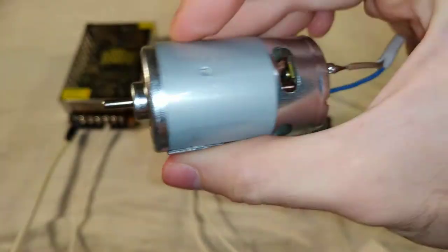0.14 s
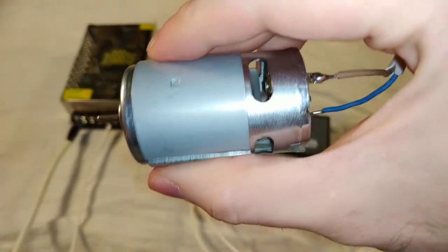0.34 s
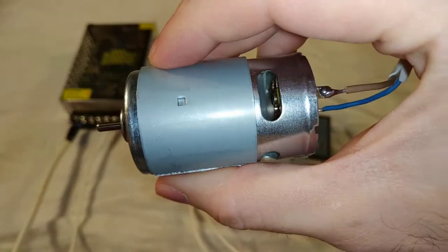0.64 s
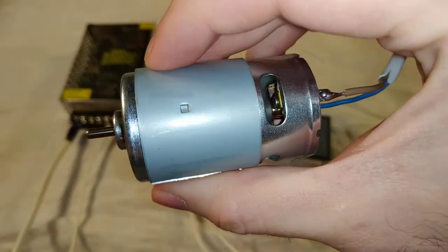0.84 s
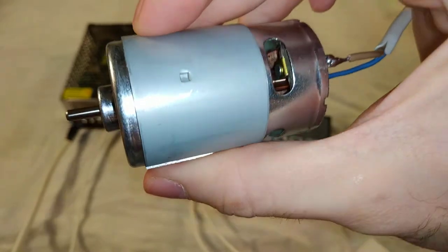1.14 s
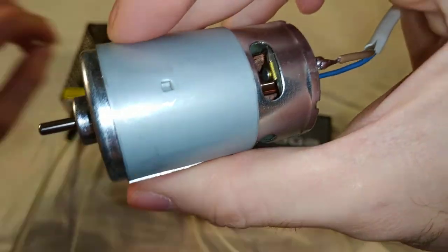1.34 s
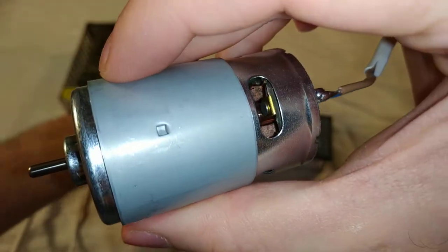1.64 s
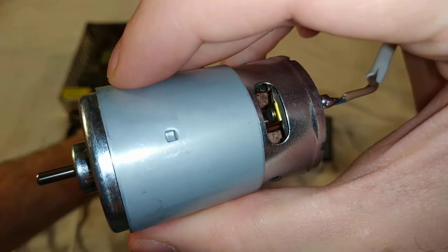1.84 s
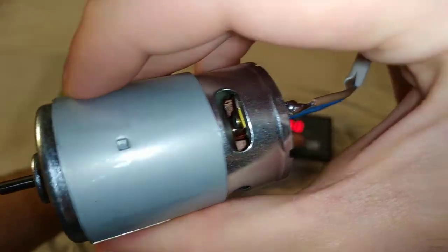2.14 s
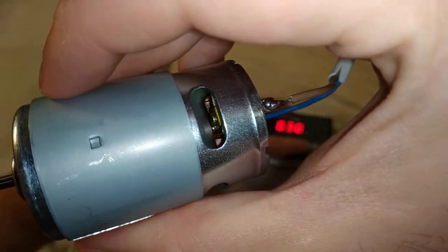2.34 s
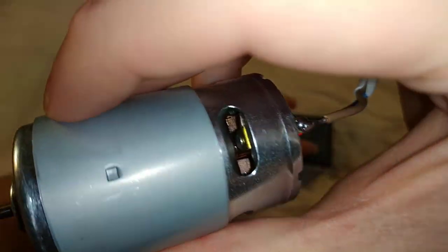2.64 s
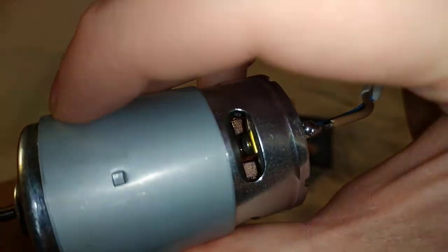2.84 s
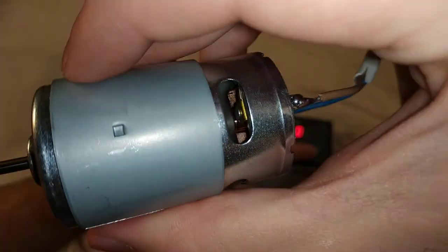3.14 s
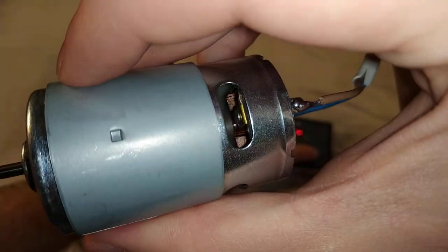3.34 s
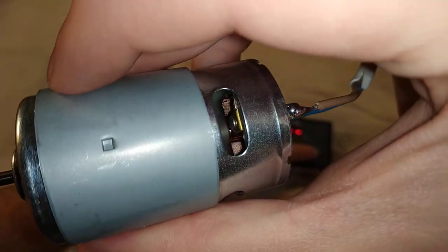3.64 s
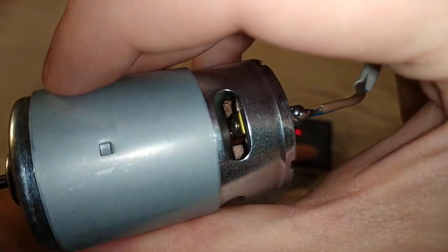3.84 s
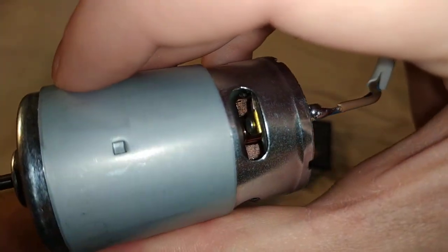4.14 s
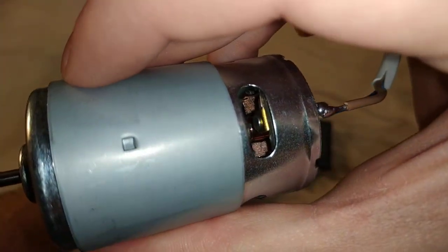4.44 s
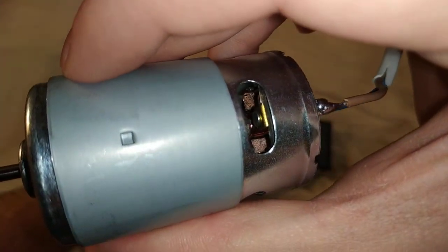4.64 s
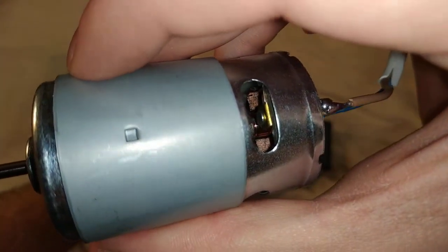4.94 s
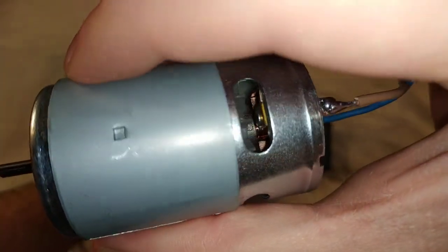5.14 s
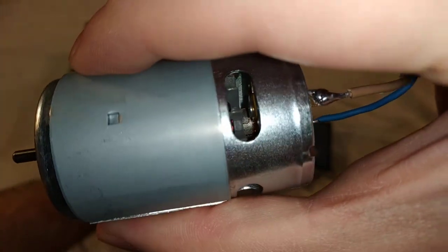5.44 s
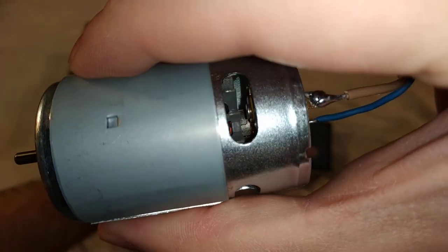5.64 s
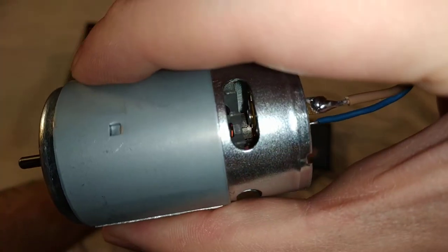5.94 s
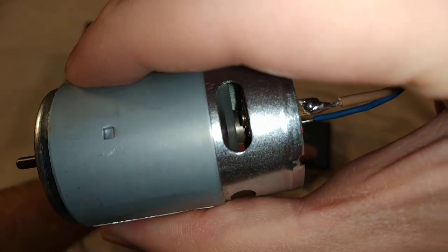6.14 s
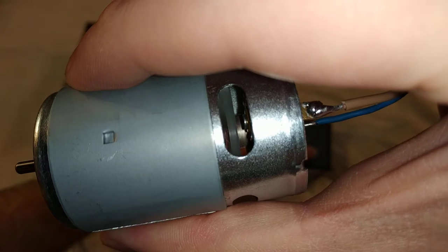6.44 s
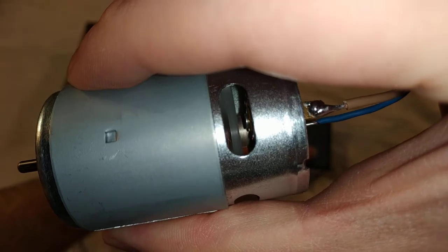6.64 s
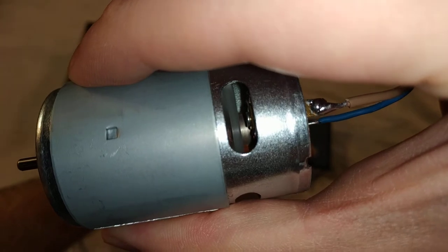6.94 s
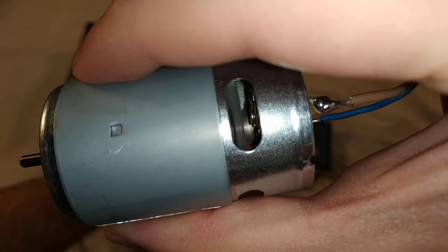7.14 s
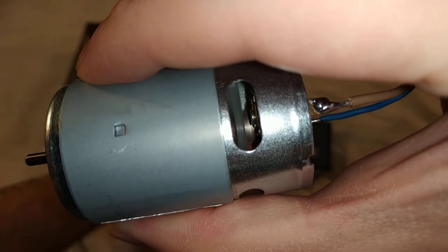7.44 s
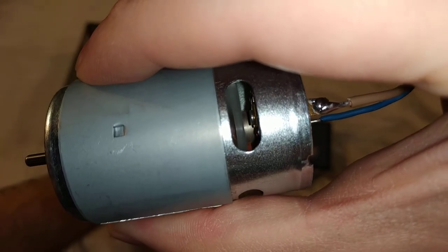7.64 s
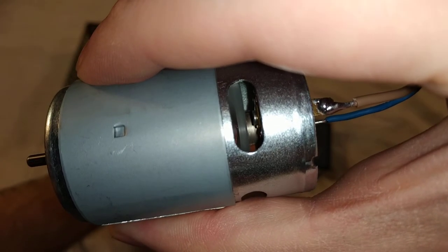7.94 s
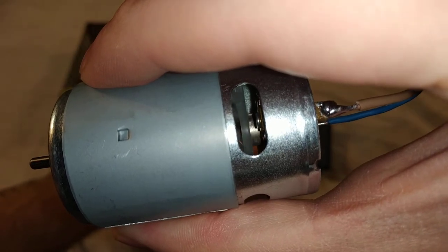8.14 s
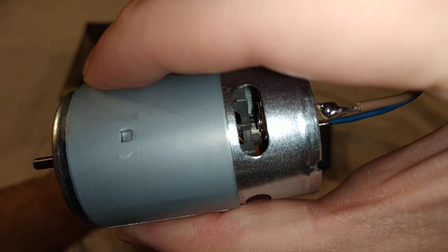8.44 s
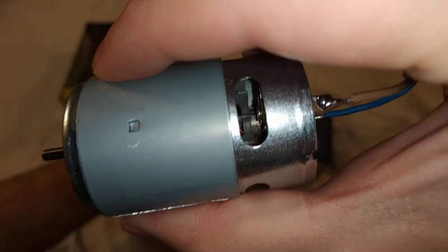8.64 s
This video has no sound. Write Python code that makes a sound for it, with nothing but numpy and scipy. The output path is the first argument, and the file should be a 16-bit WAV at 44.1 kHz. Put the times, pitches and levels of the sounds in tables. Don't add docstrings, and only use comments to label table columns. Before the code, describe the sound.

A small brushed electric motor hisses and whines steadily up close, runs down to silence amid knob clicks, then briefly spins up and dies away again.

```python
import sys
import numpy as np
from scipy import signal
from scipy.fft import rfft, irfft, next_fast_len
from scipy.io import wavfile
from scipy.ndimage import uniform_filter1d

SR = 44100
rng = np.random.default_rng(int(sys.argv[2]) if len(sys.argv) > 2 else 0)


def persist_wave(psi):
    counts = np.round(np.clip(psi, -1, 1) * 32767).astype(np.int16)
    wavfile.write(sys.argv[1], SR, np.atleast_2d(counts).T)


def invert_db(level):
    return 10 ** (np.asarray(level, dtype=float) / 20)


N = 388074
FULL_SPEED = 112.5


def evened(x):
    return x / np.sqrt(np.mean(x ** 2) + 1e-20)


def read(points, hz):
    f, value = np.transpose(points)
    return np.interp(np.log(hz + 1), np.log(f + 1), value)


def colour(x, points):
    size = next_fast_len(x.shape[-1])
    gain = invert_db(read(points, np.fft.rfftfreq(size, 1 / SR)))
    return irfft(rfft(x, size) * gain, size)[..., :x.shape[-1]]


def ring(x, hz, width):
    pole = np.exp((2j * np.pi * hz - np.pi * width) / SR)
    return 2 * signal.lfilter([1 - abs(pole)], [1, -pole], x).real


def ring_twice(x, hz, width):
    return ring(ring(x, hz, width), hz, width)


def slow(shape, size):
    once = uniform_filter1d(rng.standard_normal(shape), size, 0)
    return evened(uniform_filter1d(once, size, 0))


# pitch_hz, level_db (per Hz)
AIR_COLOUR = [(24, -74.5), (40, -44), (80, -10), (144, -10), (200, 1), (635, -11), (1730, -16), (2290, -16),
              (2530, -14.5), (6250, -13.5), (15100, -14.5), (16200, -11)]


def room_air():
    return invert_db(-61 + 5.0) * evened(colour(rng.standard_normal((2, N)), AIR_COLOUR))


# start_s, level_db
SLEEVE_RUBS = [
    [(5.0, -84), (5.154, -71), (5.288, -64), (5.498, -70), (5.6, -68)],
    [(8.15, -81), (8.328, -65), (8.402, -59), (8.59, -50.5), (8.696, -48.5), (8.8, -48)],
]
# pitch_hz, level_db (per Hz)
CLOTH_COLOUR = [(47, -82), (80, -46), (197, -7.5), (339, -2), (699, -11), (838, -3.5), (1470, -23),
                (3960, -29), (4490, -38), (6000, -35), (7800, -60), (13200, -120)]
# start_s, rate_hz, level_db
THREAD_ZIP = [
    (8.601, 1180, -85.5),
    (8.66, 1330, -66),
    (8.72, 1500, -60),
    (8.76, 1700, -53.5),
    (8.8, 1780, -51),
]


def sleeve():
    t = np.arange(N) / SR
    level = 0
    for rows in SLEEVE_RUBS:
        moving = (t > rows[0][0]) * (t < rows[-1][0])
        level = level + invert_db(np.interp(t, *np.transpose(rows))) * moving
    shared, left, right = rng.standard_normal((3, N))
    rub = evened(colour(np.array([shared + .5 * left, shared + .5 * right]), CLOTH_COLOUR))
    rub = rub * invert_db(0.9 * slow(N, size=300))
    s, hz, db = np.transpose(THREAD_ZIP)
    phase = np.cumsum(np.interp(t, s, hz) * (1 + .008 * slow(N, size=40))) / SR
    comb = 0
    for k in range(4, 10):
        comb = comb + invert_db(2.1 * slow(N, size=400) - 0.77 * k) * np.sin(2 * np.pi * k * phase)
    return level * rub + evened(comb) * invert_db(np.interp(t, s, db, left=-140))


# pitch_hz, time to fall 60 dB_s
ROOM_RING = [(200, 0.18), (900, 0.2), (3000, 0.26), (8000, 0.19), (16000, 0.086)]


def room(x):
    hz, t, z = signal.stft(rng.standard_normal((2, SR // 2)), SR, nperseg=256)
    fall = invert_db(-60 * t / read(ROOM_RING, hz)[:, None])
    tail = signal.istft(z * fall, SR, nperseg=256)[1]
    tail[:, :200] = 0
    return signal.fftconvolve(x[None], tail / np.linalg.norm(tail[0]), axes=1)[:, :N]


# start_s, peak_db, body_pitch_hz, snap_db (re body), dullness (0-1)
KNOB_CLICKS = [
    (1.9707, -11.5, 880, -16, 1),
    (3.218, -24.5, 906, 9.5, 0.17),
    (3.506, -18, 863, -9, 0.6),
    (5.6162, -23.5, 851, 5.5, 0.13),
    (5.838, -19, 887, -9.5, 0.33),
    (7.051, -22, 950, 2, 1),
    (7.306, -19.5, 876, -11, 0.6),
    (8.506, -33, 1065, -13, 0.4),
    (8.515, -38.5, 900, 5, 0),
    (8.795, -30, 398, -15, 0.56),
]
# pitch_factor (times body pitch), time to fall 60 dB_s, level_db
HOUSING_RING = [(.42, .012, -4), (.62, .014, 0.5), (.8, .012, 0), (1, .025, 5), (1.2, .015, 0),
                (1.749, 0.0035, 12), (2.95, 0.0086, -0.5)]
# pitch_hz, level_db (per Hz)
SNAP_COLOUR = [(880, -68), (1500, -5), (1950, -14), (2500, -10), (3600, -13), (4140, -10), (4760, -14),
               (5370, -8), (6170, -9.5), (11100, -15.5), (12500, -10), (16200, -46)]
# pitch_hz, time to fall 60 dB_s, level_db (re snap)
LATCH_RING = [(2500, .022, -8), (4100, .02, 1.5), (5300, .016, -2.5), (14200, .005, -20)]


def knob_body(t, hz, dull):
    body = 0
    for k, t60, db in HOUSING_RING:
        fall = 60 * t / (t60 * (1 - 0.59 * np.clip(dull, 0, 1)))
        body = body + invert_db(db + 14 * dull * (1 - k) - fall) * np.sin(2 * np.pi * k * hz * t)
    body *= 1 - np.exp(-t / (0.00039 + 0.0026 * abs(dull)))
    return body / abs(body).max()


def knob_snap(t, snap_db):
    tilt = 0.57 * snap_db
    tilted = [(f, db + tilt * np.log2(f / 4000)) for f, db in SNAP_COLOUR]
    snap = colour(rng.standard_normal(len(t)), tilted) * invert_db(-60 * t / 0.017)
    latch = sum(invert_db(db - 60 * t / t60) * np.sin(2 * np.pi * f * t) for f, t60, db in LATCH_RING)
    snap = snap / abs(snap).max() + latch * (1 - np.exp(-t / 0.00055))
    return snap / abs(snap).max()


def knob():
    out, t = np.zeros(N + 4096), np.arange(4096) / SR
    for s, db, hz, snap_db, dull in KNOB_CLICKS:
        click = knob_body(t, hz, dull) + invert_db(snap_db) * knob_snap(t, snap_db)
        out[round(s * SR):][:4096] += invert_db(db) * click
    out = signal.sosfilt(signal.butter(2, 260, "high", fs=SR, output="sos"), out)[:N]
    return out * invert_db(np.array([[.8], [-.8]])) + invert_db(-6.5) * room(out)


def ticks(t, turns, angle, sizes, jitter):
    at = np.arange(len(sizes))[:, None] + np.floor(turns[0]) + angle
    at = at + jitter * rng.standard_normal(sizes.shape)
    place = np.interp(at, turns, np.arange(len(t)), left=-99, right=-99).ravel()
    keep = place > 0
    place = place[keep][:, None]
    taps = np.floor(place) + np.arange(-7, 9)
    away = taps - place
    kernel = np.sinc(away) * np.cos(np.pi * away / 16) ** 2
    weights = (kernel * sizes.ravel()[keep][:, None]).ravel()
    index = np.clip(taps, 0, len(t)).astype(int).ravel()
    return np.bincount(index, weights, len(t) + 1)[:len(t)]


def turn_count(turns):
    return int(turns[-1] - turns[0]) + 2


def thinned(x):
    return signal.sosfilt(signal.butter(3, 230, "high", fs=SR, output="sos"), x)


def by_speed(speed, db, power, slack_db):
    stall = 1.47
    share = np.clip((speed - stall) / (FULL_SPEED - stall), 1e-3, 2)
    return invert_db(db + slack_db * (1 - share)) * share ** power


# pitch_hz, width_hz, level_db
COG_RING = [(454, 270, -5.5), (815, 184, 1)]


def cogs(t, speed, turns):
    sizes = invert_db(1.5 * rng.standard_normal((turn_count(turns), 3)))
    jolt = thinned(ticks(t, turns, np.arange(3) / 3, sizes, 0.002))
    jolt = evened(sum(invert_db(db) * ring_twice(jolt, f, w) for f, w, db in COG_RING))
    slow_gain = (FULL_SPEED / np.maximum(speed, 10)) ** 1.5
    slack = np.clip(3 * (1 - speed / FULL_SPEED), 0, 1)
    return invert_db(-12) * slow_gain * slack * (speed > 7) * jolt


# pitch_hz, width_hz, level_db
SHELL_RING = [(278, 278, 4), (810, 173, 5), (2370, 1260, 1)]
# pitch_hz, level_db (per Hz)
RUMBLE_COLOUR = [(40, -50), (80, -30), (140, -18), (220, -3.5), (326, -7), (849, -12), (1000, -6.5),
                 (1080, -11.5), (2300, -14.5), (2900, -8.5), (3220, -24.5), (4500, -15), (5850, -34),
                 (9900, -120)]


def rumble(t, speed, turns):
    sizes = invert_db(1.2 * rng.standard_normal((turn_count(turns), 1)))
    knock = thinned(ticks(t, turns, 0, sizes, 0.0011))
    knock = evened(sum(invert_db(db) * ring_twice(knock, f, 1.2 * w) for f, w, db in SHELL_RING[1:]))
    knock_gain = invert_db(-6) * (speed.max() / np.maximum(speed, 34)) ** 0.9 * (speed > 19)
    grind = evened(colour(rng.standard_normal(len(t)), RUMBLE_COLOUR))
    shell = evened(ring_twice(rng.standard_normal(len(t)), *SHELL_RING[1][:2]))
    slack = 1 - speed / speed.max()
    noise = (1 - 0.36 * slack) * grind + 0.34 * slack * shell
    return cogs(t, speed, turns) + noise + knock_gain * knock


def edge(hz):
    return invert_db(-16 / (1 + np.exp((hz - 4000) / 20)))


def cap_lift(hz):
    u, sharpness = hz / 940, 5
    return np.sqrt(0.76 + 1 / ((1 - u ** 2) ** 2 + (u / sharpness) ** 2))


SLOT_ORDERS = (6, 9, 12, 15, 18)
SLOT_LEVELS = [-19, -4, -12, -19, -19]
PULL_ORDERS = (2, 3, 4, 5, 7, 8, 10, 11, 13, 14, 16, 17, 19, 20, 21, 22, 23, 24, 25, 26, 27, 28, 29)
PULL_LEVELS = [
    [-25.5, -8.5, -17.5, -12.5, -16, -14.5, -13.5, -17, -21, -12, -25, -15.5, -10, -9.5, -7, -47, -33, -3.5,
     -31, -4, -5.5, -39, -41],
    [-20, -4, -12, -11.5, -11.5, -21, -12.5, -14, -37, -15.5, -35, -9.5, -10, -11.5, -11, -37, -12, -13,
     -12, -30, -1.5, -16, -18],
]
CAN_ORDERS = tuple(range(30, 77))
CAN_LEVELS = [
    [-12, -11, -12, -11, -13, -23, -16, -19, -0.5, 0, 1.66, -37, -17, -1.5, 0.7, -23, -11, -5.5, -20, 1, -1,
     -3.5, 8, -12, 0, -17, -22, -5, -1, -2, 5, 2.4, -4, -11, -5, -4, -16, -14, -23, -10.5, -4.5, -24, -30,
     -8, -16, -22, -7],
    [-24, -33, -18, -29, -16, -32, -18, -18, 1.5, -8, 1.3, 4, -7, -9, -1, 0, -8, -8, -4, -15, 0, 2, -11, -9,
     -11, -18, -11, 4, -1, -5, -17, 0, -10, 1.5, 0.094, 3.5, -4, -13, -5, -8, 1.2, -6, -7, -10, -15, 2.5,
     -11],
]
# start_s, level_db
PALM_DAMPING = [(0, -12), (1.15, 0), (1.5, -1.5), (3.3, 1.5), (6.5, -5), (7.5, -2)]


def hum(t, speed, turns, run, tilt):
    orders = [*SLOT_ORDERS, *PULL_ORDERS, *CAN_ORDERS]
    levels = [*SLOT_LEVELS, *PULL_LEVELS[run], *CAN_LEVELS[run]]
    coarse, out = speed[::256], 0
    palm_db = np.interp(t[::256], *np.transpose(PALM_DAMPING))
    waver = slow((len(coarse), len(orders)), size=14)
    drift, fuzz = slow(waver.shape, size=70), rng.standard_normal(waver.shape)
    for i, (k, db) in enumerate(zip(orders, levels)):
        hz, full_hz, unsteady = k * coarse, k * FULL_SPEED, np.sqrt(k / 40)
        fall = 7 if k in CAN_ORDERS else .7 if k in SLOT_ORDERS else 2.6
        gain = invert_db(db + unsteady * (1.48 * waver[:, i] + 3.0 * drift[:, i]))
        gain = gain * (1 + 0.33 * unsteady * fuzz[:, i])
        gain = gain * cap_lift(hz) / cap_lift(full_hz) * (coarse / FULL_SPEED) ** fall
        gain = gain * np.clip(coarse / 25, 0, 1) ** 3 * edge(hz) / edge(full_hz)
        if k > 35:
            gain = gain * invert_db(tilt[::256] * np.log2(k / 72))
        gain = gain * np.clip(hz / 600, .6 * (k < 6), 1) ** 1.5
        gain = gain * invert_db(palm_db * np.exp(-((hz - 2970) / 330) ** 2))
        out = out + np.interp(t, t[::256], gain) * np.sin(2 * np.pi * (k * turns + rng.random()))
    return invert_db(-45.0) * out


# angle_turns, ring_hz, width_hz, level_db (re brush)
BRUSH_STEPS = [
    [(0.201, 10360, 1100, -13), (0.562, 6816, 796, -16), (0.745, 14260, 1200, -19),
     (0.897, 5180, 720, -27.5)],
    [(0.02, 9020, 1330, -13.5), (0.563, 6770, 800, -22), (0.746, 12600, 1500, -21), (0.899, 5240, 727, -21)],
]


def steps(t, turns, table):
    count, out = turn_count(turns), 0
    for angle, hz, width, db in table:
        sizes = invert_db(1.8 * slow((count, 1), size=12) + 1.5 * rng.standard_normal((count, 1)))
        out = out + invert_db(db) * evened(ring_twice(ticks(t, turns, angle, sizes, 0.0013), hz, width))
    return out


def patches(x, tilt, patchy_db, frames, bins):
    z = signal.stft(x, nperseg=512)[2]
    field = evened(uniform_filter1d(slow(z.shape[::-1], frames), bins, 1)).T
    octaves = np.log2(np.linspace(SR / 512, SR / 2, len(z)) / 8100)[:, None]
    turned = octaves * tilt[np.minimum(np.arange(z.shape[1]) * 256, len(x) - 1)]
    return signal.istft(z * invert_db(patchy_db * field + turned), nperseg=512)[1][:len(x)]


# pitch_hz, level_db (per Hz)
CAN_COLOUR = [(1800, -38), (2500, -30), (3200, -31.5), (3600, -32), (3950, -45), (4080, -23), (4700, -7),
              (5000, -8), (5500, -12.5), (5900, 1), (6200, -10.5), (6600, -9.5), (7500, -7.5), (8100, -10),
              (9200, -5), (10500, -3), (12000, -2.5), (14400, -3.5), (15600, -7.5), (16300, -6)]
# pitch_hz, level_db (per Hz)
SLACK_COLOUR = [(3900, -25.5), (4060, -7.5), (5000, -6), (5800, -12), (7000, -6.5), (9000, -13),
                (11000, -16), (14000, -27), (16000, -21)]


def brush(t, speed, turns, tilt):
    wear, loose, scrape = 0.65, 0.14, 0.52
    count = turn_count(turns)
    spots = rng.standard_normal(90) * invert_db(0.8 * rng.exponential(1, 90))
    change = wear * slow((count, 90), size=30) + loose * rng.standard_normal((count, 90))
    sizes = spots * (1 + change)
    off_speed = np.interp(np.arange(count) + turns[0], turns, abs(1 - speed / FULL_SPEED))
    play = .0002 + .014 * off_speed[:, None]
    rough = evened(ticks(t, turns, rng.random(90), sizes, play))
    contact = uniform_filter1d(rough ** 2, 24) + 0.51
    drive = rough + scrape * evened(np.sqrt(abs(contact)) * rng.standard_normal(len(t)))
    slack = np.sqrt(np.clip(3.5 * (1 - speed / FULL_SPEED), 0, 1))
    sound = colour(drive, CAN_COLOUR) + slack * colour(drive, SLACK_COLOUR)
    return patches(sound, tilt, 2.8, frames=70, bins=3) / np.std(sound[slack < .3])


def shaded(x, notches):
    hz = np.fft.rfftfreq(len(x), 1 / SR)
    cut_db = sum(db * np.exp(-((hz - f) / w) ** 2) for f, w, db in notches)
    return irfft(rfft(x) * invert_db(cut_db), len(x))


# pitch_hz, likeness (0-1)
EAR_LIKENESS = [(60, 0.03), (180, 0.88), (550, 0.33), (1650, 0.7), (4970, 0.69), (15000, 0.044)]
# pitch_hz, phase_radians
EAR_LEAD = [(0, 4.5), (2410, -2.5), (4310, -5.5), (4820, 12.5), (5170, -15), (5860, 2.5), (6890, 9),
            (8180, 25), (9220, -6), (10400, -15.5), (13000, -36.5), (13500, 5), (14000, -21), (15900, -44)]
# pitch_hz, level_db
EAR_TILT = [(60, 24), (130, -11.5), (290, -7), (640, -6.5), (1410, -3.5), (3100, -8), (6820, -4.5),
            (15000, -2)]


def ports(a, b):
    hz = np.fft.rfftfreq(len(a), 1 / SR)
    same = np.clip(read(EAR_LIKENESS, hz), 0, 1)
    tilt = read(EAR_TILT, hz) - np.mean(np.transpose(EAR_TILT)[1])
    left = rfft(a)
    right = same * left * np.exp(-1j * read(EAR_LEAD, hz)) + np.sqrt(1 - same ** 2) * rfft(b)
    return irfft(np.array([left * invert_db(tilt / 2), right * invert_db(-tilt / 2)]), len(a))


# start_s, speed_turns_per_s
SHAFT_SPEED = [
    [(0.0, 111.6), (0.12, 111.6), (0.24, 112.4), (2.73, 112.7), (3.25, 112.5), (3.31, 111.9), (3.51, 100.3),
     (3.8, 69.7), (3.97, 45.9), (4.12, 22.3), (4.24, 4), (4.29, 1)],
    [(5.96, 10.5), (6.35, 67.7), (6.67, 106.9), (6.8, 110), (7.07, 111.9), (7.24, 106.9), (7.49, 86.2),
     (7.64, 68), (7.81, 44.8), (7.958, 22.7), (8.07, 4), (8.11, 1)],
]
KNOCK_TIMES = [
    [3.9007, 3.9606, 4.0065, 4.0329, 4.0623, 4.0965, 4.141],
    [6.0317, 6.0731, 6.1055, 6.1344, 6.1604, 6.2063, 7.6262, 7.6875, 7.7773, 7.8202, 7.8711, 7.901, 7.936,
     7.98],
]
# start_s, nearness_db, left_right_db, brightness_db_per_octave
HAND_MOVES = [(0, -1.5, -4, 2), (.3, 0, -1.5, -0.2), (.75, 0, -2.5, 0), (1.1, 0.06, -4.5, 1),
              (1.5, 0, -3.5, -0.5), (1.95, 0.6, -3.5, 0), (2.299, 0.64, -2, 1.1), (2.7, 0.04, -2.5, -0.7),
              (3.202, 0.1, -2.5, 2.5), (3.6, -1.35, -3.5, -0.7), (4.2, -5.5, -7, -0.5),
              (6, -4.5, -3.5, 1.8), (6.5, -0.5, -3, 0.4), (7.05, 0.6, -1.5, -0.1), (7.55, -1, -3.5, 0.8),
              (8.1, -4, -2.5, -0.5)]
# notch_hz, width_hz, level_db
FINGER_GRIP = [
    [(4750, 60, -14.5), (5580, 166, -6.5), (6073, 195, -4), (7830, 170, -3.5), (9100, 160, 1.5),
     (11660, 220, -4.5), (12950, 200, -8), (15300, 260, 3)],
    [(5770, 360, -5.5), (9950, 200, -10), (11570, 220, -15.5), (12800, 250, -9), (15100, 290, -7)],
]


def motor():
    out = np.zeros((2, N))
    for run, (spin, knocks) in enumerate(zip(SHAFT_SPEED, KNOCK_TIMES)):
        start, end = spin[0][0], spin[-1][0]
        first = round(start * SR)
        t = np.arange(first, first + round((end - start) * SR / 1024) * 1024) / SR
        s, *columns = np.transpose(HAND_MOVES)
        near_db, pan_db, tilt = (np.interp(t, s, c) for c in columns)
        speed = uniform_filter1d(np.interp(t, *np.transpose(spin)), 3000)
        turns = np.cumsum(speed) / SR
        at = np.interp(knocks, t, turns)
        turns -= np.interp(t, knocks, np.unwrap(at - np.round(at), period=1))
        tones = hum(t, speed, turns, run, tilt)
        drops = thinned(steps(t, turns, BRUSH_STEPS[run])) * np.clip(speed / 35, 0, 1) ** 2
        high = by_speed(speed, db=-24, power=1.48, slack_db=8)
        low = by_speed(speed, db=-50.5, power=1.89, slack_db=24.5)
        views = []
        for _ in range(2):
            brushes = shaded(brush(t, speed, turns, tilt) + drops, FINGER_GRIP[run])
            views.append(high * brushes + low * rumble(t, speed, turns) + tones)
        fade = np.clip(np.minimum(t - t[0] + (start == 0), t[-1] - .025 - t) / 0.03, 0, 1)
        level = invert_db(2.5 + near_db + pan_db * np.array([[.5], [-.5]])) * fade
        out[:, first:][:, :len(t)] += ports(*views) * level
    return out


def scene():
    return room_air() + sleeve() + knob() + motor()


def band_limit(x):
    return signal.sosfilt(signal.butter(12, 16380, fs=SR, output="sos"), x)


def record(dry):
    thin = signal.sosfilt(signal.butter(2, 196, "high", fs=SR, output="sos"), dry)
    top = signal.firwin(numtaps=767, cutoff=15740, window=("kaiser", 8), fs=SR)
    mix = signal.oaconvolve(thin, top[None], "same", axes=1)
    return band_limit(mix)


dry = scene()
out = record(dry)
persist_wave(out)
```